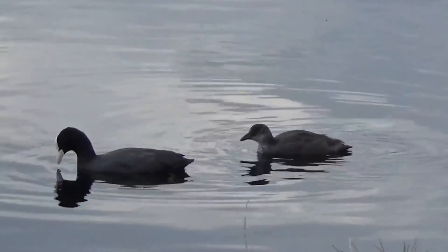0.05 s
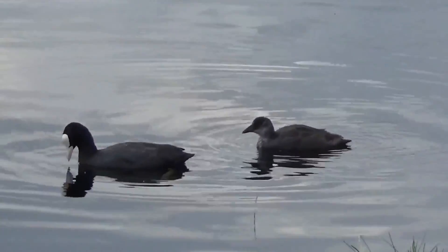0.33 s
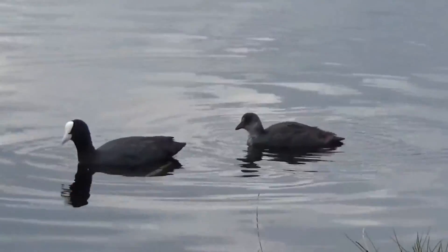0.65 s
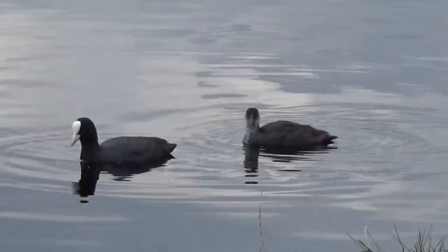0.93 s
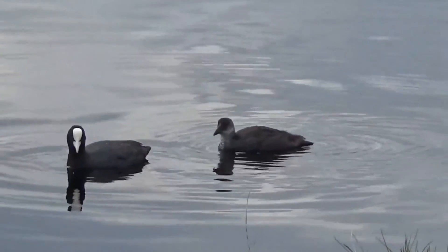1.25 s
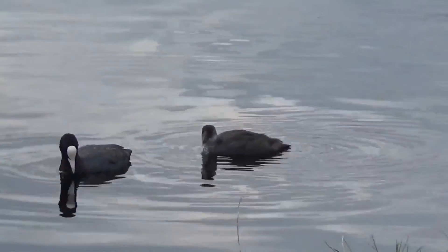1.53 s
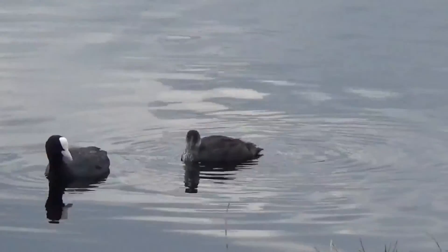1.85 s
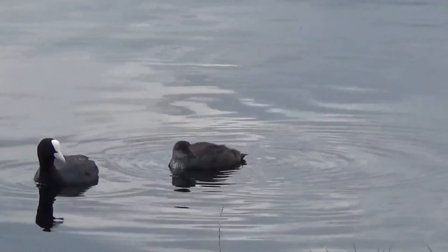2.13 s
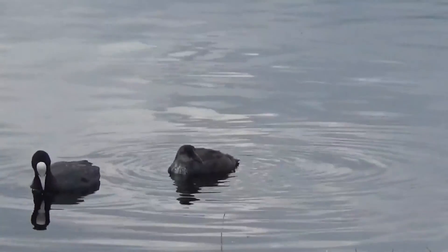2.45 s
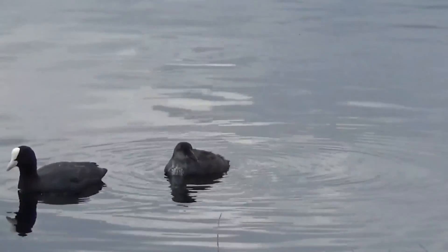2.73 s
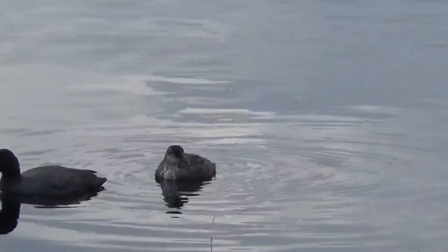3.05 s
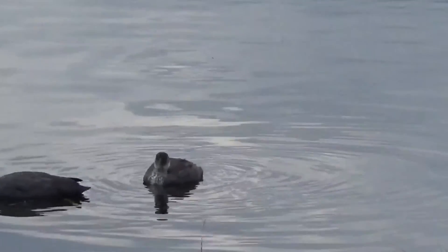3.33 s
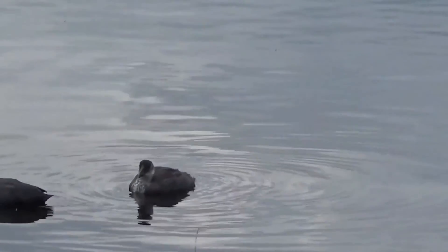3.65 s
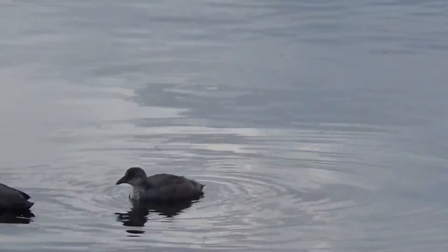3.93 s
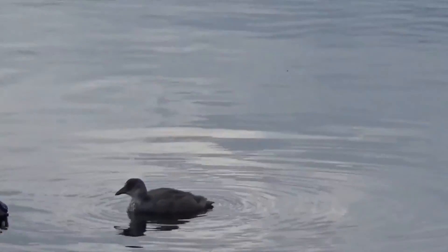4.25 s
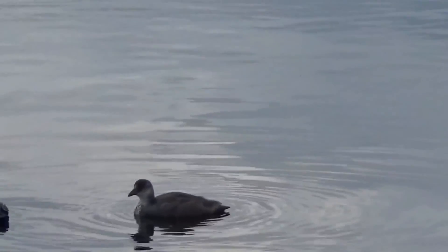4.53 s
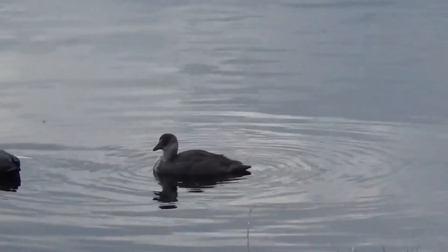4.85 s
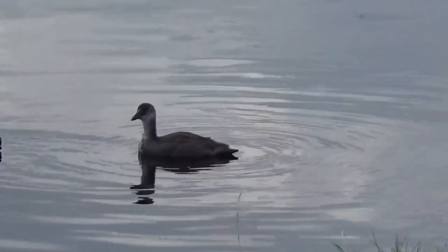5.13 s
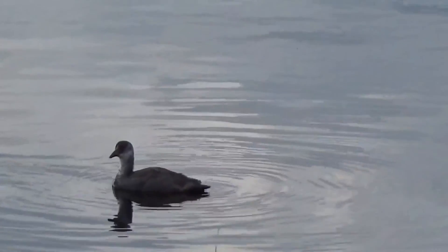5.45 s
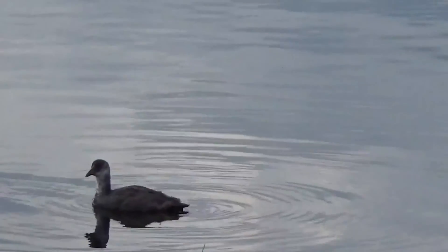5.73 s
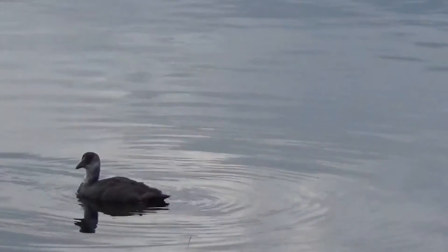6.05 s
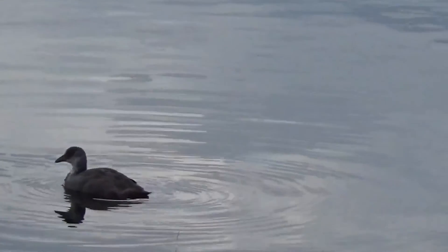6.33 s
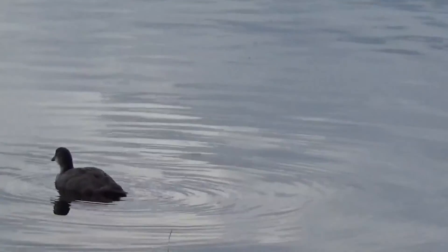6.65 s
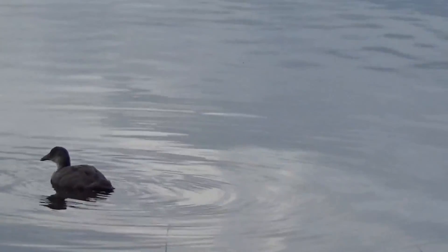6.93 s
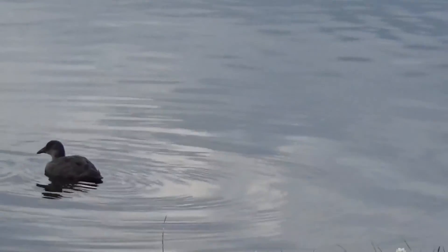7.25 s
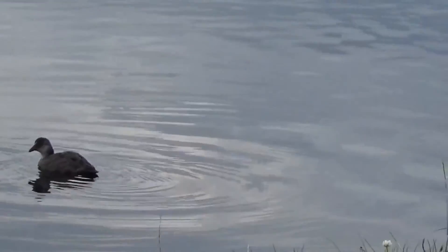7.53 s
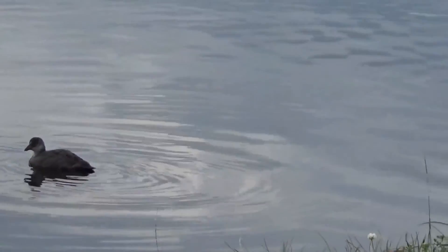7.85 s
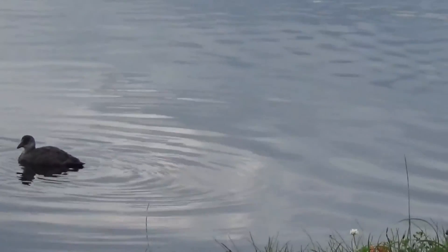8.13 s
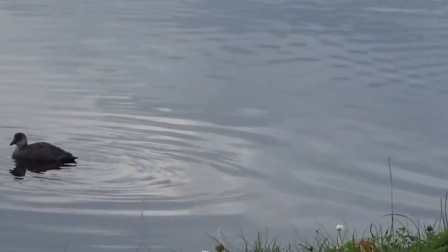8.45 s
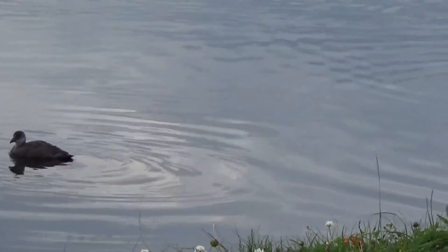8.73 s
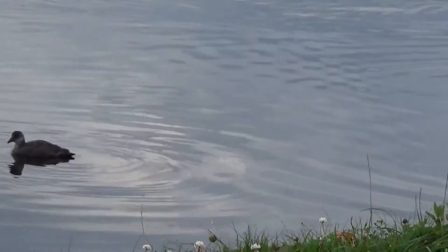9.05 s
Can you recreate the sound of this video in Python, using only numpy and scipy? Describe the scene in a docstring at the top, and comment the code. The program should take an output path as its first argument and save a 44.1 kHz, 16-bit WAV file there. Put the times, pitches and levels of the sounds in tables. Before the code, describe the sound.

High, wavering water bird cries come every second or so, mixed with a chick's repeated peeps, heard from the edge of a quiet lake. Distant birds rasp, yelp and trill faintly with a slight echo. Sharp clicks snap near the microphone around the middle, then a single shrill squeak stands out as the loudest sound. More peeps and a cry follow over a steady, soft outdoor hush.

```python
"""A calm lake, heard from the bank, with coots calling. A chick peeps in short pitch arches, young birds
give wavering cries that crack to half their pitch, and one bird gives a loud, fluttering squeak.
Rasps, trills and yelps come from farther off and echo from the banks. Dry clicks sound close by,
and a camera's mechanism ticks faintly under the wash of open air."""
import sys
import numpy as np
from scipy import signal
from scipy.fft import rfft, irfft
from scipy.io import wavfile
from scipy.ndimage import uniform_filter1d

SR = 44100
rng = np.random.default_rng(int(sys.argv[2]) if len(sys.argv) > 2 else 0)


def log_audio(samples):
    """Write samples as a 16-bit WAV file to the path given in sys.argv[1]."""
    # one column per channel
    frames = np.atleast_2d(samples).T
    # limit to full scale, then quantise
    limited = np.clip(frames, -1, 1)
    pcm = np.round(limited * 32767).astype(np.int16)
    wavfile.write(sys.argv[1], SR, pcm)


N = 410130

# air spectrum: freq_hz, gain_db
AIR_SPECTRUM = [(25, -55.5), (45, -33), (75, -10.5), (150, -17.5), (230, -13), (330, -6.5), (520, -10.5),
                (1000, -12), (2700, -13), (3600, -17), (4500, -21), (9800, -22), (11500, -29.5)]
# left-right likeness of the air: freq_hz, coherence
AIR_COHERENCE = [(60, 0.7), (170, 0.94), (490, 0.67), (1390, 0.15), (3980, 0.46), (11400, 0.5)]
# drift of the air's low mids, used about its median: time_s, level_db
AIR_MID_DRIFT = [(0.3, -68.5), (1.25, -68.5), (1.58, -70), (3.38, -69), (3.58, -67.5), (4.34, -70.5),
                 (5.64, -69), (5.79, -67), (6.77, -70.5), (7.87, -69.5), (8.09, -68.5), (9.3, -71.5)]
# rumble swells: centre_s, half_width_s, gain_db
RUMBLE_SWELLS = [(1.452, 0.49, 6.5), (5.05, .2, 3.5), (6.15, .2, 5), (7.805, 0.39, 7)]
# camera case modes: freq_hz, gain_db, t60_s
CASE_MODES = [(159, -17, 0.21), (361.7, 1.5, 0.028), (517, -5.5, 0.036)]
# bank echo decay: freq_hz, t60_s
BANK_DECAY = [(300, .7), (2000, .7), (5000, .55), (10000, .45)]
# far rasps: start_s, length_s, top_hz, level_db, top_fraction
RASP_CALLS = [(0.449, 0.36, 2280, -62.5, 0.42), (1.511, 0.4, 2214, -62.5, 0.32),
              (2.576, 0.44, 2240, -61.5, 0.24), (3.033, 0.63, 1268, -64.5, 0.37),
              (3.672, 0.35, 2244, -59, 0.4), (4.21, .64, 1290, -61, .33), (4.733, 0.47, 2240, -62, 0.38),
              (8.19, 0.32, 2220, -65, 0.08)]
# far yelps: start_s, length_s, first_hz, last_hz, level_db
YELP_CALLS = [(0.546, 0.046, 1200, 1700, -58), (.672, 0.011, 930, 700, -55), (.678, 0.022, 538, 640, -56.5),
              (0.785, 0.028, 883, 932, -57), (0.792, 0.0166, 1150, 1750, -51), (0.932, 0.02, 540, 730, -55),
              (0.992, 0.021, 577, 677, -52)]
# far whistles: start_s, length_s, first_hz, last_hz, level_db, trill_depth_hz
WHISTLE_CALLS = [(.083, 0.15, 2930, 2790, -55.5, 0), (.305, 0.036, 3150, 3700, -68, 0),
                 (0.849, 0.079, 3000, 2700, -69, 0), (1.19, 0.062, 1780, 1690, -69, 0),
                 (2.378, 0.064, 3200, 3100, -63.5, -2), (2.497, .095, 2690, 2450, -67.5, 0),
                 (2.544, 0.079, 2060, 1720, -65, 0), (3.074, 0.041, 3430, 3120, -64, 4),
                 (3.17, .05, 3100, 3180, -64, 0), (5.442, .17, 1960, 2044, -63.5, 111),
                 (6.582, 0.079, 1804, 1707, -63, 0), (6.656, 0.097, 1874, 2090, -62, 150),
                 (6.826, 0.055, 2710, 2565, -60, 0), (6.9, 0.091, 2630, 2430, -63, 257),
                 (7.31, 0.11, 1870, 2584, -65, 0)]
# dry clicks: start_s, relative_db, tilt_db_per_octave
CLICK_HITS = [(1.401, -50, -1), (3.929, -37, 4), (4.072, -27.5, 5), (4.083, -33.5, 2.5), (4.098, -19, 3),
              (4.131, -30, 0), (4.147, -19.5, 4), (4.15, -21, 2.5), (4.212, -39.5, 4), (4.419, -41, -3),
              (4.499, -30, -1.5), (4.977, -31.5, 6), (5.144, -37, -1.5), (5.255, -33.5, -3.5),
              (5.343, -31.5, 2), (6.298, -48.5, 4), (6.384, -36.5, 3), (6.44, -33, -7.5),
              (6.456, -30, -2.5), (6.495, -46.5, 3), (6.631, -43, -19), (6.68, -39.5, -4), (7.295, -45, -8),
              (9.167, -48, -2)]
# click spectrum: freq_hz, gain_db
CLICK_SPECTRUM = [(120, -58.5), (200, -21), (845, -3), (1410, 0), (2040, 2.5), (2770, -3.5), (3340, -1),
                  (3630, -7), (3890, -6.5), (5360, -9), (6800, -15), (10600, -16), (11500, -31),
                  (15000, -50.5), (22000, -120)]
# hollow rings: start_s, pitch_hz, level_db, t60_s
PLOP_RINGS = [(4.101, 1020, -38, 0.05), (4.148, 908, -25, 0.031), (5.258, 604, -43, 0.037),
              (6.457, 707, -35, 0.04)]
# chick peeps: centre_s, top_hz, base_db
PEEP_CALLS = [(0.04, 5480, -50.5), (.162, 5200, -48), (.454, 4950, -50), (.562, 5280, -48.5),
              (.751, 5430, -49.5), (1.028, 5280, -50), (1.153, 5170, -49), (1.292, 5390, -50),
              (1.59, 5420, -52), (1.7, 5420, -51), (1.827, 5330, -50.5), (2.044, 5360, -50),
              (2.366, 5420, -58), (2.47, 5400, -56), (2.6, 4810, -52), (2.741, 5170, -51.5),
              (3.056, 5020, -57), (3.164, 4670, -55), (3.296, 5240, -53), (3.574, 5300, -52),
              (3.693, 5360, -49.5), (3.847, 4630, -53), (4.143, 5200, -57), (4.261, 5190, -53),
              (4.404, 4560, -54.5), (4.539, 4540, -55.5), (5.309, 4580, -66.5), (5.421, 4460, -63.5),
              (5.573, 4520, -62), (5.701, 4450, -63), (5.847, 4440, -62.5), (6.805, 5390, -64.5),
              (6.924, 5130, -57.5), (7.055, 5330, -55), (7.19, 5400, -55), (7.366, 5370, -54),
              (7.778, 4870, -54), (7.888, 4910, -53.5), (8.055, 4670, -52.5), (8.214, 4380, -55.5),
              (8.984, 4440, -66), (9.068, 5030, -69), (9.193, 4720, -57.5)]
# chick's tone as it turns: time_s, top_gain_db, octave_gain_db
PEEP_TONE = [(.75, -6.5, -15.5), (1.8, -4, -10), (3.6, -5.5, -18), (4.3, 3, -14.5), (7.4, 6, -16.5),
             (9.2, -1, -16.5)]
# one curve per cry, points: time_s, pitch_hz, effort_db
CRY_CURVES = [
    [(-.15, 2090, -48.5), (.07, 2140, -46), (.1, 2195, -40.5), (.21, 2330, -38.5), (.24, 2290, -38),
     (.258, 2160, -45.5), (.278, 1995, -58.5)],
    [(1.83, 2090, -55.5), (1.88, 2394, -65), (1.93, 2464, -54.5), (2.023, 2355, -47), (2.05, 2105, -46),
     (2.09, 2086, -45), (2.15, 2077, -48.5), (2.195, 2215, -51.5), (2.252, 1720, -51.5)],
    [(3.205, 2830, -46), (3.235, 2680, -51), (3.248, 2090, -47), (3.31, 2140, -54), (3.36, 2450, -61)],
    [(3.44, 2880, -55), (3.47, 2840, -45), (3.51, 2600, -52.5), (3.535, 2045, -53), (3.565, 1800, -51)],
    [(4.75, 1688, -59), (4.89, 2110, -63), (4.94, 2290, -54.5), (5.05, 2136, -49.5), (5.14, 2410, -48),
     (5.18, 2720, -47.5), (5.217, 2700, -49.5), (5.237, 2010, -47.5), (5.265, 1830, -49)],
    [(5.675, 2346, -63), (5.72, 2177, -55.5), (5.81, 2043, -55.5), (5.88, 2126, -56), (5.94, 2110, -63)],
    [(6.205, 1940, -54), (6.235, 2612, -61.5), (6.29, 2693, -52), (6.35, 2770, -61)],
    [(7.43, 2770, -56.5), (7.48, 2560, -51.5), (7.52, 2527, -51), (7.57, 2744, -52.5), (7.64, 2867, -45.5),
     (7.745, 2925, -42), (7.768, 2720, -48), (7.777, 2060, -42.5), (7.81, 1873, -53.5)],
]
# one row per cry: overtone_gain_db, half_pitch_gain_db, hoarseness, hiss_gain_db, left_db
CRY_MANNERS = [(13, 12, 0.23, -30.5, -1.2), (1.5, -2.5, 0.45, -16.5, -2.5), (2, -4.5, .25, -13, -3),
               (3.5, -5, .8, -24, -1.5), (-1.5, -11, 0.9, -10, -2.5), (-25, -20, 0.4, -26, 1),
               (-22, -16, 0.13, -28, 1), (0, -14, 0.45, -10, -1.2)]
# spectra of a cry's overtones, half-pitch tones and breath: freq_hz, gain_db
OVERTONE_SPECTRUM = [(3500, 0.5), (4500, -2.5), (5700, -15.5), (6800, -10.5), (8000, -16.5), (9200, -16.5),
                     (10300, -17), (11500, -55)]
HALF_PITCH_SPECTRUM = [(2200, 8), (3200, -5.5), (5400, -7), (7600, -13), (9800, -4.5), (11000, 2)]
BREATH_SPECTRUM = [(600, -25.5), (1500, 3), (2300, 4), (4600, 4.5), (6500, -12.5), (8000, -0.5),
                   (9500, -5.5), (11200, -12.5)]
# throat noise of the squeak: freq_hz, gain_db
THROAT_SPECTRUM = [(150, -11), (550, 1.5), (1500, -4), (3000, -1), (4800, -1), (7500, -7), (9000, -3),
                   (10500, 11.5), (11800, -0.5)]


def amp(db):
    """dB to gain."""
    return 10 ** (np.asarray(db) / 20)


def unit(x):
    """Scale to rms 1."""
    return x / np.sqrt(np.mean(x ** 2) + 1e-20)


def read(points, hz):
    """Interpolate on a log-frequency axis."""
    f, value = np.transpose(points)
    return np.interp(np.log(hz + 1), np.log(f + 1), value)


def add(mix, start_s, sound):
    """Mix in a sound; start_s may be negative."""
    at = round(start_s * SR)
    sound = sound[max(-at, 0):]
    part = mix[max(at, 0):][:len(sound)]
    part += sound[:len(part)]


def angle(hz):
    """Running phase, rad."""
    return 2 * np.pi * np.cumsum(hz) / SR


def wander(t, cutoff_hz):
    """Low-passed noise over t, rms about 1."""
    size = len(t) + 4096
    lowpass = np.exp(-(np.fft.rfftfreq(size, 1 / SR) / cutoff_hz) ** 2)
    return unit(irfft(rfft(rng.standard_normal(size)) * lowpass))[:len(t)]


def fade(t, edge_s):
    """Sine-squared edges."""
    return np.sin(np.pi / 2 * np.clip(np.minimum(t - t[0], t[-1] - t) / edge_s, 0, 1)) ** 2


def colour(x, points):
    """Filter by points of freq_hz, gain_db."""
    return irfft(rfft(x) * amp(read(points, np.fft.rfftfreq(x.shape[-1], 1 / SR))), x.shape[-1])


def place(x, left_db):
    """Pan by left-over-right level."""
    return x * amp([[left_db / 2], [-left_db / 2]])


def widen(x, side_db):
    """Off-axis sound reaches the two microphone ports out of step in the mid band."""
    band = [(300, -16.5), (1000, -6), (2200, -5.5), (4500, -5), (10000, -21)]
    side = amp(side_db) * colour(signal.hilbert(x).imag, band)
    return np.array([side, -side])


def air(level_db=-61.5, hiss_db_per_s=-0.5):
    """Distant wash of the lake: rumble swells, mids drift, hiss sinks."""
    hz, t = np.fft.rfftfreq(2048, 1 / SR)[:, None], np.arange(N // 512 + 5) * 512 / SR
    a, b, c, d, patches = rng.standard_normal((len(t), len(hz), 5)).T
    coherence = read(AIR_COHERENCE, hz)
    left = a + 1j * b
    right = coherence * left + np.sqrt(1 - coherence ** 2) * (c + 1j * d)
    times_s, levels_db = np.transpose(AIR_MID_DRIFT)
    mid_db = np.interp(t, times_s, levels_db - np.median(levels_db))
    rumble_db = sum(db * np.exp(-((t - at_s) / half_s) ** 2) for at_s, half_s, db in RUMBLE_SWELLS)
    hiss_db = hiss_db_per_s * (t - t.mean())
    low, high = read([(90, 1), (160, .04)], hz), read([(700, .089), (4000, 1)], hz)
    drift_db = low * rumble_db + (2 - low - high) * mid_db + high * hiss_db
    patch_db = 1.1 * unit(uniform_filter1d(uniform_filter1d(patches, 5, 0), 24, 1))
    spectra = np.array([left, right]) * amp(read(AIR_SPECTRUM, hz) + drift_db + patch_db)
    return amp(level_db) * unit(signal.istft(spectra, nperseg=2048, noverlap=1536)[1][:, :N])


def camera_ticks(level_db=-71, rate_hz=26.92):
    """A small mechanism ticks evenly and rings the case."""
    age_s = (np.arange(N) / SR + .00391) % (1 / rate_hz)
    ring = sum(np.sin(2 * np.pi * hz * age_s) * amp(db - 60 * age_s / t60_s)
               for hz, db, t60_s in CASE_MODES)
    return amp(level_db) * unit(colour(ring, [(50, -45), (130, 3), (600, -2.5), (1500, -14)]))


def bank_echo(x):
    """Scattered echoes from the banks; treble dies first."""
    taps = rng.standard_normal((2, SR)) * (rng.random((2, SR)) < .06) * (np.arange(SR) > 500)
    hz, t, spectra = signal.stft(taps, SR, nperseg=256)
    tail = signal.istft(spectra * amp(-60 * t / read(BANK_DECAY, hz)[:, None]), SR, nperseg=256)[1]
    return signal.fftconvolve(x[None], tail / np.linalg.norm(tail[0]), axes=1)[:, :N]


def rasps(pulse_hz=68, lower_db=-15, upper_db=-10, skirt_db=-9, sag=.2, jitter=.028):
    """A rattling nasal tone rises and sinks in a skirt of hoarse noise."""
    out = np.zeros(N)
    for start_s, length_s, top_hz, db, top_fraction in RASP_CALLS:
        t = np.arange(0, length_s, 1 / SR)
        off_top = ((t / length_s - top_fraction) / (1 - top_fraction)) ** 2
        scoop = np.exp(-t / (.3 * top_fraction * length_s))
        phase = angle(top_hz * (1 - sag * (off_top + scoop / 2) + jitter * wander(t, 440)))
        pulses = .5 + np.cos(angle(pulse_hz * (1 + .18 * wander(t, 40))) / 2) ** 2
        upper = np.sin(1.48 * phase) + .6 * np.sin(1.82 * phase)
        skirt = amp(skirt_db) * wander(t, 260) * np.cos(phase)
        tone = np.sin(phase) + skirt + amp(upper_db) * upper + amp(lower_db) * np.sin(phase / 2)
        envelope = amp(-7 * off_top + 2 * wander(t, 160)) * fade(t, .012)
        add(out, start_s, amp(db) * unit(tone * pulses * envelope))
    return out


def yelps(jitter=.071):
    """Short slurred notes from across the water."""
    out = np.zeros(N)
    for start_s, length_s, first_hz, last_hz, db in YELP_CALLS:
        t = np.arange(0, length_s, 1 / SR)
        phase = angle(np.linspace(first_hz, last_hz, len(t)) * (1 + jitter * wander(t, 450)))
        add(out, start_s, amp(db) * unit(np.sin(phase) * fade(t, .0053)))
    return out


def whistles(trill_hz=41):
    """Thin far glides, some trilled."""
    out = np.zeros(N)
    for start_s, length_s, first_hz, last_hz, db, depth_hz in WHISTLE_CALLS:
        t = np.arange(0, length_s, 1 / SR)
        glide_hz = first_hz + (last_hz - first_hz) * t / length_s
        hz = glide_hz - depth_hz * np.cos(2 * np.pi * trill_hz * t) + 15 * wander(t, 200)
        add(out, start_s, np.sqrt(2) * amp(db) * np.sin(angle(hz)) * fade(t, .0044))
    return out


def clicks(gain_db=-6, t60_s=.02, tail_db=-34, tail_t60_s=.059, low_cut_hz=440):
    """Light cracks of fast-decaying noise, bright or dull, without bass."""
    out, t = np.zeros(N), np.arange(4096) / SR
    for start_s, db, tilt_db_per_octave in CLICK_HITS:
        tilt = [(hz, tilt_db_per_octave * np.log2(hz / 1000)) for hz in (700, 10000)]
        noise = colour(colour(rng.standard_normal(len(t)), CLICK_SPECTRUM), tilt)
        decay = amp(-60 * t / t60_s) + amp(tail_db - 60 * t / tail_t60_s)
        crack = noise * decay * fade(t, .0003)
        add(out, start_s, amp(db + gain_db) * crack / np.std(crack[:100]))
    return signal.sosfilt(signal.butter(3, low_cut_hz, "high", fs=SR, output="sos"), out)


def plops():
    """Hollow ring under some heavier clicks."""
    out, t = np.zeros(N), np.arange(4096) / SR
    for start_s, hz, db, t60_s in PLOP_RINGS:
        add(out, start_s, amp(db - 60 * t / t60_s) * np.sin(2 * np.pi * hz * t) * fade(t, .001668))
    return out


def chick_peeps(base_hz=3953, flat_half_s=.017, half_s_per_hz=5.5e-6, span=1.773):
    """Pitch arches over one base note; high peeps last longer, low ones start near their top."""
    out = np.zeros(N)
    times_s, tops_db, octaves_db = np.transpose(PEEP_TONE)
    for centre_s, top_hz, db in PEEP_CALLS:
        rise_hz = top_hz - base_hz
        half_s = flat_half_s + half_s_per_hz * rise_hz
        t = np.arange(-span * half_s, span * half_s, 1 / SR)
        arch = 1 / (1 + abs(t / (.8 * half_s)) ** rng.uniform(2.6, 3.9))
        slant = np.interp(top_hz, [4400, 5000], [.35, .06])
        hz = base_hz + rise_hz * (arch - (1 - arch) * (.036 + slant * t / half_s))
        phase = angle(hz * (1 + .005 * wander(t, 300) + .006 * wander(t, 50.43)))
        top_db = np.interp(centre_s, times_s, tops_db) * np.exp(-((hz - 5450) / 300) ** 2)
        fundamental = amp(top_db + 2.5 * wander(t, 120)) * np.sin(phase)
        colour_db = read([(4200, -16), (4700, -2), (5200, 8), (5550, -5.5)], hz)
        octave = amp(np.interp(centre_s, times_s, octaves_db) + colour_db) * np.sin(2 * phase)
        envelope = np.sqrt(2) * amp(db + .8 * t / half_s) * fade(t, .017)
        add(out, centre_s + t[0], envelope * (fundamental + octave))
    return out


def cries(break_hz=2123, break_width_hz=139, bill_open_s=.024, bill_close_s=.0057):
    """A whistle with overtones; forced near its break, alternate cycles differ and it turns hoarse."""
    out = np.zeros((2, N))
    for curve, (bright_db, crack_db, hoarseness, hiss_db, left_db) in zip(CRY_CURVES, CRY_MANNERS):
        times_s, *columns = np.transpose(curve)
        t = np.arange(times_s[0], times_s[-1], 1 / SR)
        hz, effort_db = (uniform_filter1d(np.interp(t, times_s, c), 300) for c in columns)
        ease_db = effort_db - effort_db.max()
        # effort brightens the overtones; the shut bill muffles them
        shut = np.exp((t[0] - t) / bill_open_s) + np.exp((t - t[-1]) / bill_close_s)
        overtone_db = effort_db + bright_db + .22 * ease_db - 20 * shut
        upper_db = .71 * (overtone_db - effort_db - 7.5)
        clear = 1 - np.exp(-((hz - break_hz) / break_width_hz) ** 2)
        half_pitch_db = effort_db + crack_db + .72 * ease_db - 32.5 * clear
        forced = np.clip(.36 + 2 * amp(half_pitch_db - np.maximum(effort_db, overtone_db)), 0, 1)
        hoarse = hoarseness * forced
        waver = .0023 * wander(t, 120) + .003 * hoarseness * wander(t, 40)
        phase = angle(hz * (1 + waver + .02 * hoarse * wander(t, 617.7)))
        slip_rad = 2 * hoarse * wander(t, 166)  # cycles alternate only loosely
        overtones = sum(amp(read(OVERTONE_SPECTRUM, k * hz) + (k > 2) * upper_db) * np.sin(k * phase)
                        for k in range(2, 6))
        half_tones = sum(amp(read(HALF_PITCH_SPECTRUM, k * hz)) * np.sin(k * phase + slip_rad)
                         for k in (1.5, 2.5, 3.5, 4.5))
        voice = amp(effort_db) * np.sin(phase) + amp(overtone_db) * overtones
        voice += amp(half_pitch_db) * half_tones
        voice *= np.sqrt(2) * amp(1.8 * hoarse * wander(t, 230))
        breath = unit(colour(rng.standard_normal(len(t)), BREATH_SPECTRUM))
        breath *= forced * amp(hiss_db) * (amp(effort_db) + amp(overtone_db))
        attack_s = np.interp(effort_db[0], [-66, -54], [.04, .003])  # soft cries creep in
        envelope = (1 - np.exp(-(t - t[0]) / attack_s)) * fade(t, .0032)
        for ear, sound in zip(out, place((voice + breath) * envelope, left_db)):
            add(ear, t[0], sound)
    return out


def squeak(start_s=5.9945, pitch_hz=5087, level_db=-18, hold_s=.098, drop_s=.016, flutter_hz=159.9,
           settle_s=.068, strain_s=.045, drop_hz_per_s=69600, drop_db_per_s=1796.5, throat_lead_s=.0405):
    """A hoarse start, then a loud note: it lands from above, its flutter slows and fades, it drops."""
    out = np.zeros(N)
    t = np.arange(0, hold_s + drop_s, 1 / SR)
    unsettled = 1 / (1 + (t / settle_s) ** 6)
    strain = 1 / (1 + (t / strain_s) ** 6)  # under strain the octave leads
    late_s = np.maximum(t - hold_s, 0)
    scoop_hz = 693.5 * np.exp(-t / .0084)
    hz = pitch_hz * (1 + .004 * wander(t, 70)) + scoop_hz - drop_hz_per_s * late_s
    flutter_rad = angle(flutter_hz * unsettled)
    gate = 1 - unsettled * (.5 + .5 * np.tanh(2.5 * np.cos(flutter_rad) - .6))
    jitter = .005 * (.2 + 2 * unsettled) * wander(t, 1200)
    phase = angle(hz * (1 + .018 * unsettled * np.sin(flutter_rad) + jitter))
    fundamental = amp(-5.5 * strain - drop_db_per_s * late_s) * np.sin(phase)
    octave = amp(.5 * strain - 5.5 * (1 - strain) + 1.8 * wander(t, 497.6)) * np.sin(2 * phase)
    envelope = np.sqrt(2) * amp(level_db) * np.minimum(t / .0099, 1) * fade(t, .01)
    add(out, start_s, envelope * gate * (fundamental + octave))
    # throat noise: starts first, weaker under the note
    t = np.arange(0, .18, 1 / SR)
    voiced_s = t - throat_lead_s
    throat_db = -37 - 7.5 * np.clip(voiced_s / .02, 0, 1) - 448.5 * np.maximum(voiced_s - hold_s, 0)
    throat = colour(rng.standard_normal(len(t)), THROAT_SPECTRUM)
    throat *= 1 + .14 * np.sin(2 * np.pi * 230 * t)
    add(out, start_s - throat_lead_s, amp(throat_db) * unit(throat) * fade(t, .009))
    return out


def scene():
    """Near birds almost dry, far ones with bank echo, over air and ticks."""
    cry, peep, note = cries(), chick_peeps(), squeak()
    click, whistle, far = clicks() + plops(), whistles(), rasps() + yelps()
    cry_mono = cry.mean(0)
    direct = cry + place(peep, 1.3) + place(note, 2.7) + whistle + place(click, 1.2) + place(far, -1)
    side = widen(click, 1) + widen(far + whistle, -22) + widen(cry_mono, -9)
    send = colour(cry_mono, [(2200, -17.5), (4400, -31.5)]) + colour(note, [(5200, -33), (10000, -22)])
    send += amp(-17) * peep + amp(-24) * click + amp(-7.5) * whistle + amp(-4.5) * far
    return direct + side + bank_echo(send) + air() + camera_ticks()


def record(dry, cutoff_hz=11300):
    """Steep low-pass band limit."""
    return signal.oaconvolve(dry, signal.firwin(301, cutoff_hz, window=("kaiser", 7), fs=SR)[None], "same")


dry = scene()
out = record(dry)
log_audio(out)
```